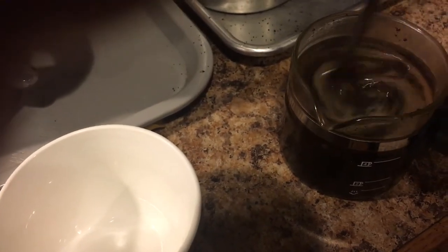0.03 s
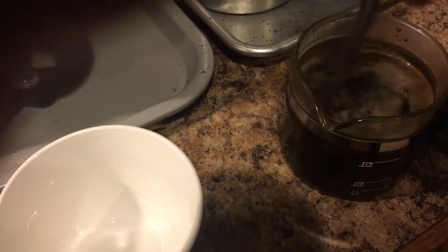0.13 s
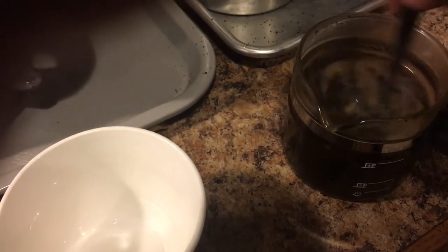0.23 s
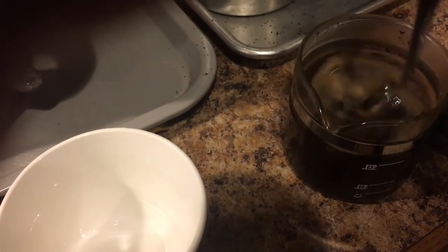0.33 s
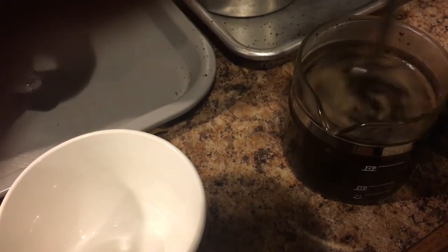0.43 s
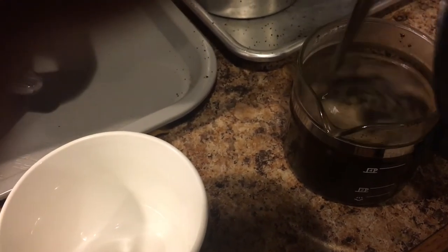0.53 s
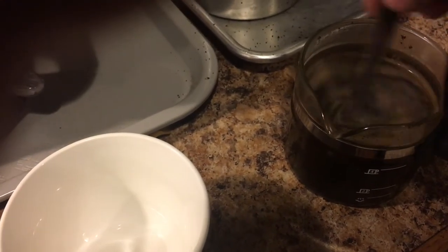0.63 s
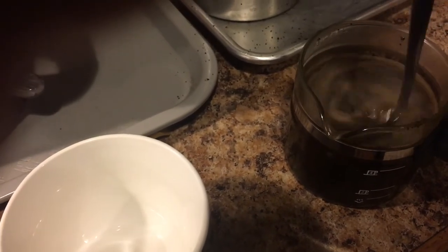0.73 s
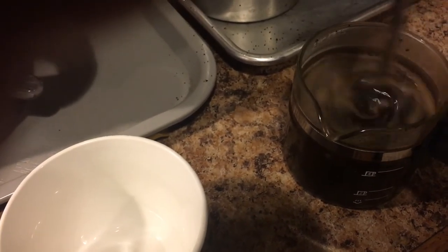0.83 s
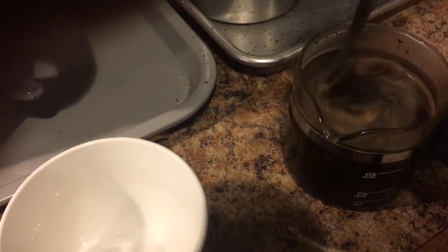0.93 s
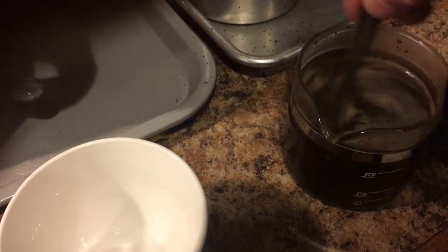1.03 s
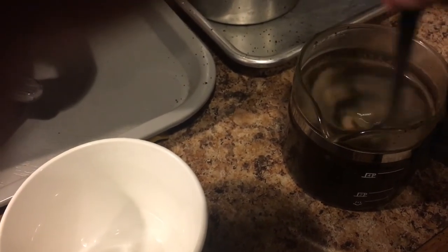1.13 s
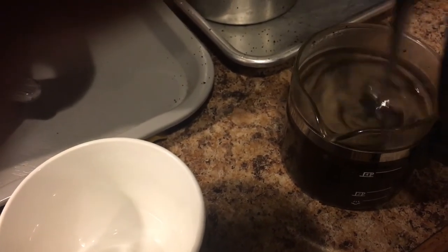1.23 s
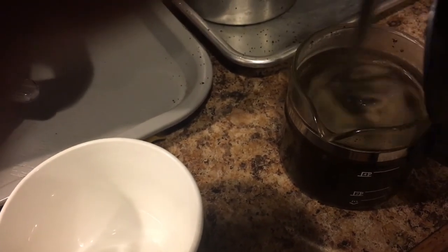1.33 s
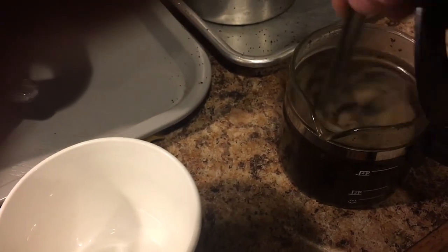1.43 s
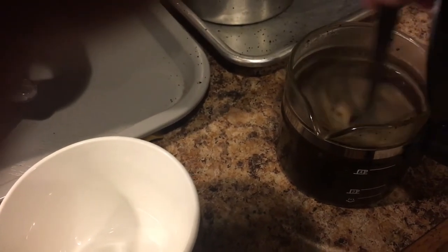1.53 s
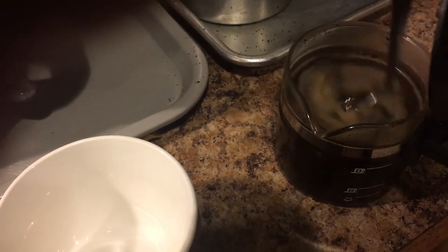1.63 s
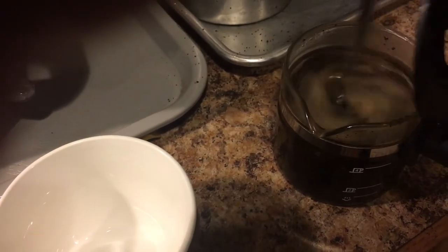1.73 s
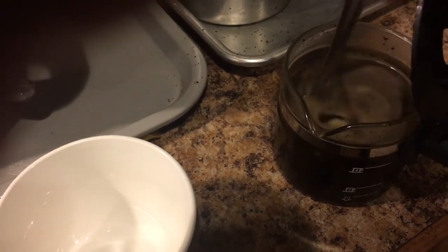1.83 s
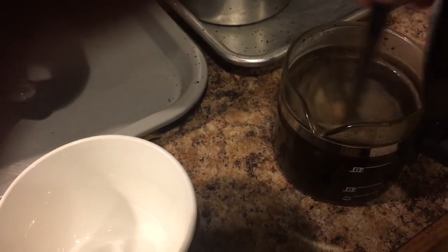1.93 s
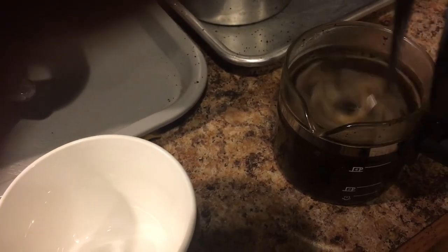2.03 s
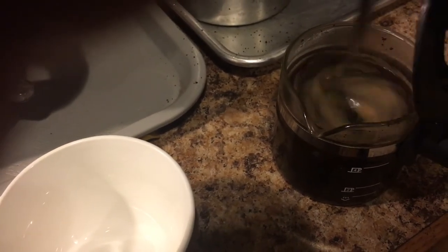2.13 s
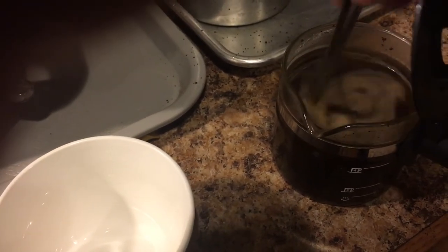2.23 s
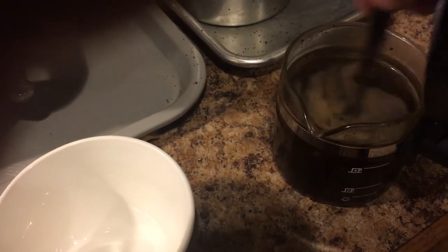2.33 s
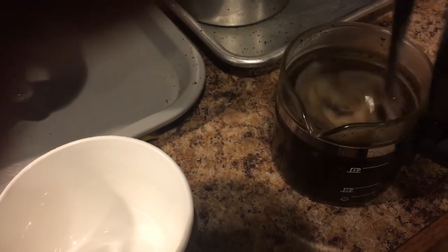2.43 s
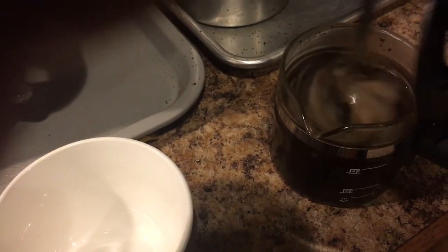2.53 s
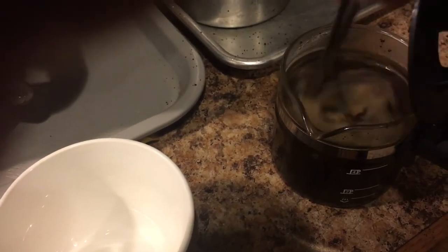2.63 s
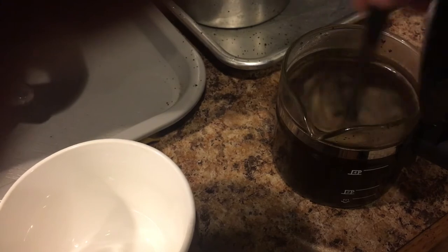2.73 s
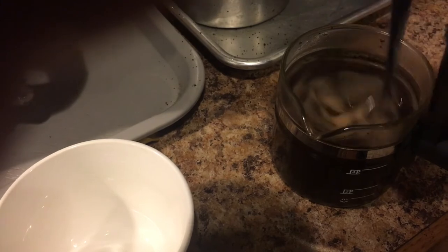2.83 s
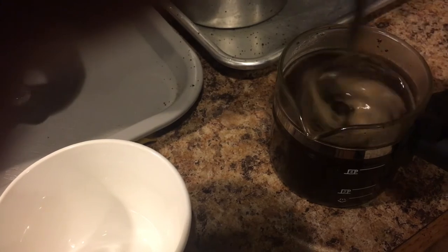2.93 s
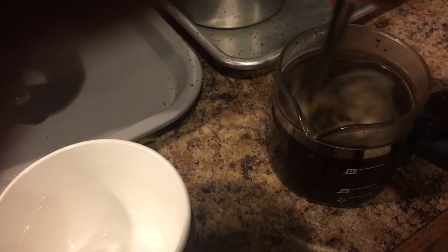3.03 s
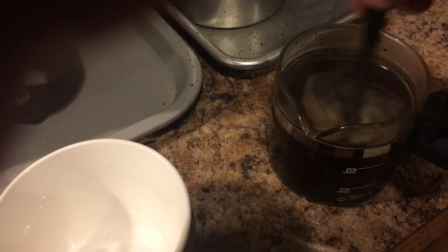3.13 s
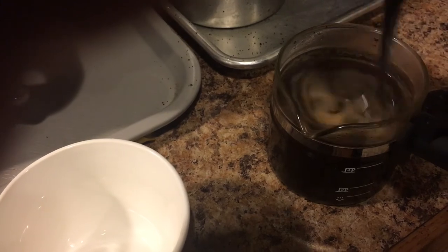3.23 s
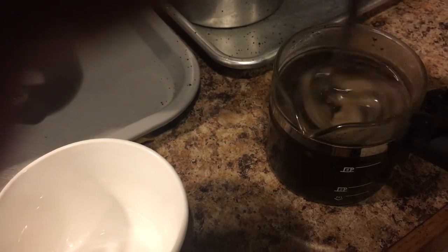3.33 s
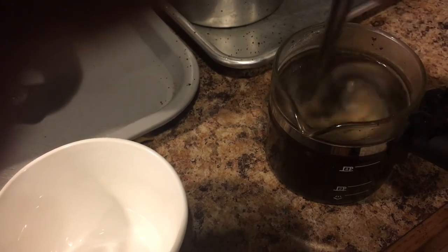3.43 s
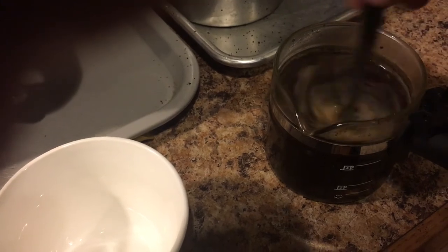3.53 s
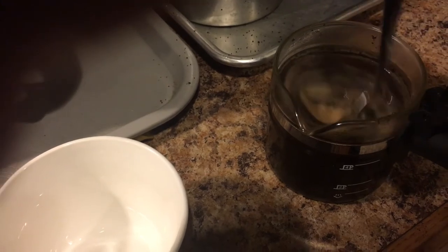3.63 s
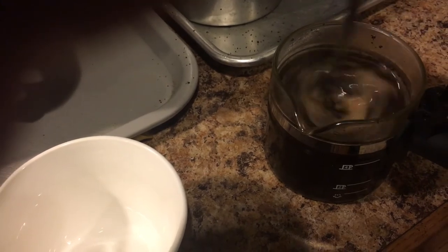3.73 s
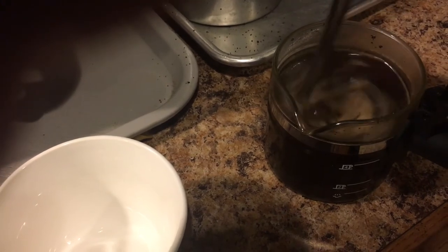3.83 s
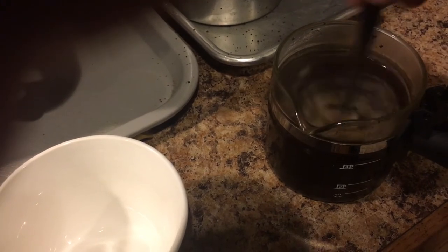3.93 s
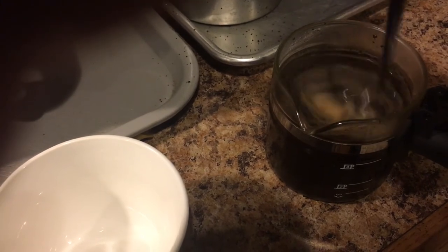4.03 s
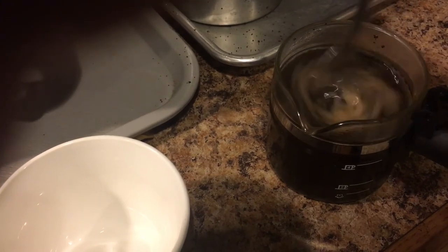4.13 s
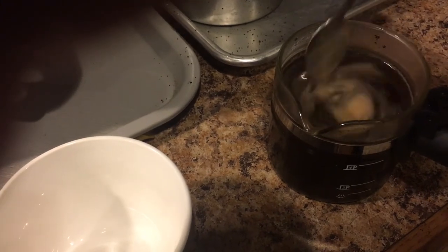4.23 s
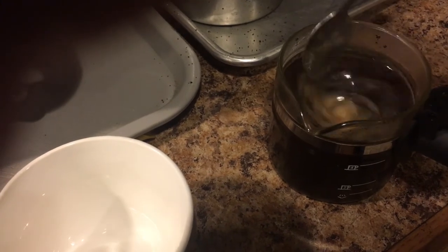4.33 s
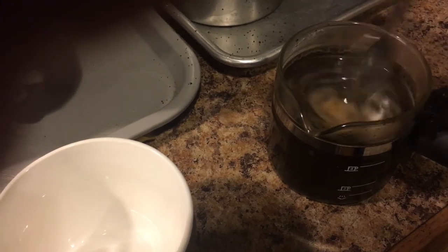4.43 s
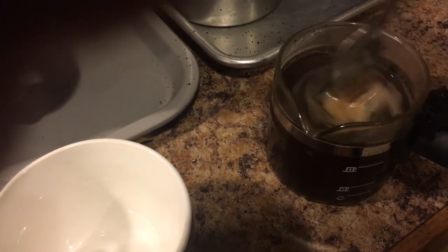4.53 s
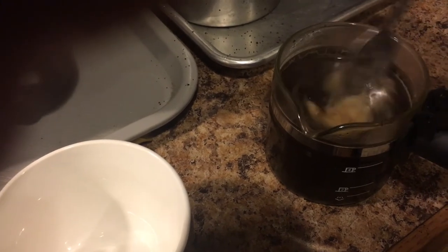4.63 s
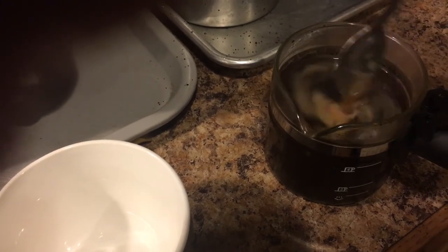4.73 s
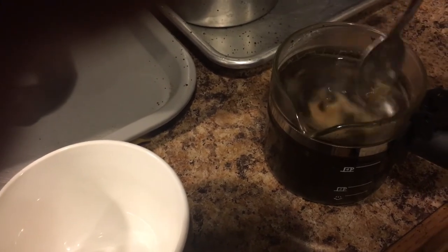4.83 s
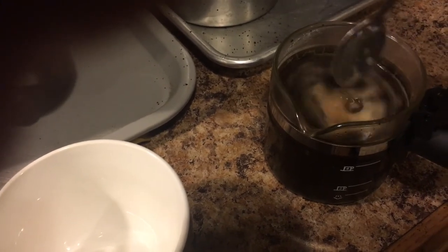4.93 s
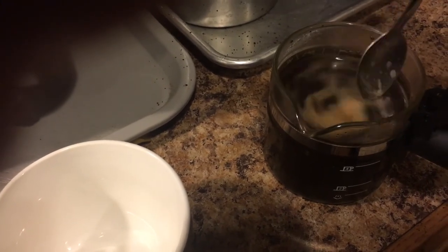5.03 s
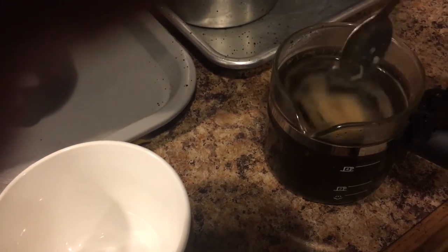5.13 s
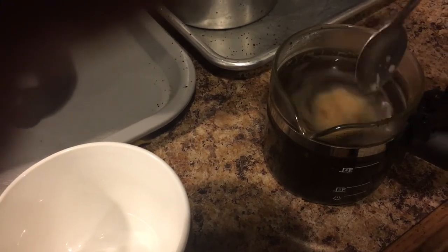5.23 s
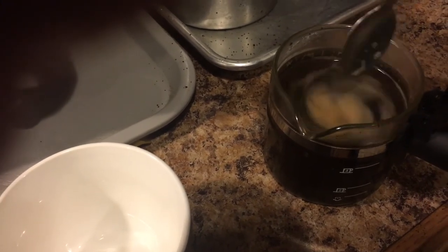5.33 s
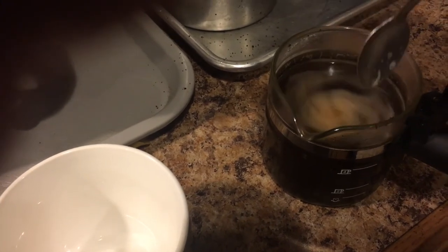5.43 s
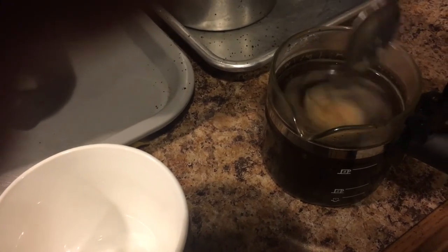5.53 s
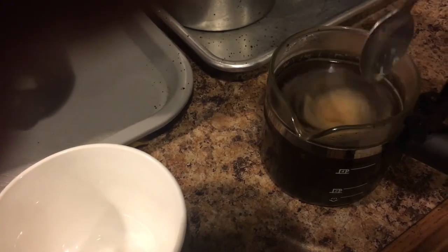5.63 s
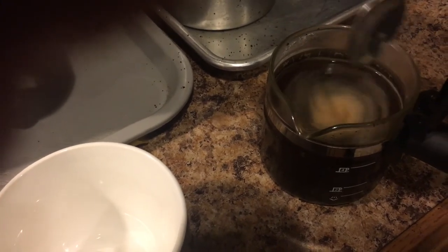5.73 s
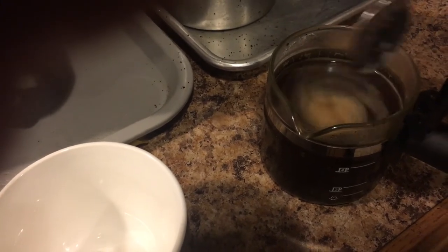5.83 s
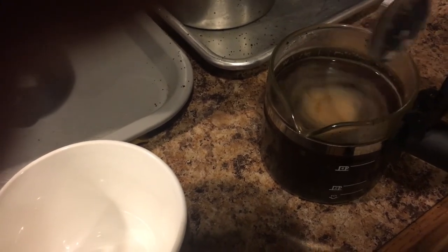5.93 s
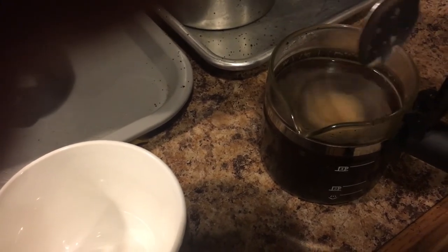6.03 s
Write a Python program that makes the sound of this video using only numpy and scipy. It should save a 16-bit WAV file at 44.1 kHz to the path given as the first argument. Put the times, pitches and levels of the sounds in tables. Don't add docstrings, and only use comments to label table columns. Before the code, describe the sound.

A steel spoon stirs a liquid-filled glass carafe, knocking near and far walls alternately with short, damped, uneven clinks, some doubled by tiny bounces. After about four and a half seconds it taps the rim seven times, steadier and more ringing. Soft rubs, low room rumble and late dull bumps sit underneath. Small kitchen, short echoes, close phone microphone.

```python
import sys
import numpy as np
from scipy import signal
from scipy.io import wavfile
from scipy.ndimage import uniform_filter1d

SR = 44100
rng = np.random.default_rng(int(sys.argv[2]) if len(sys.argv) > 2 else 0)


def store_pcm(level_fs):
    pcm = np.round(np.clip(level_fs, -1, 1) * 32767).astype(np.int16)
    wavfile.write(sys.argv[1], SR, np.atleast_2d(pcm).T)


def boost(x):
    u = np.asarray(x, float) / 20
    return 10 ** u


N = 267598

# (frequency [Hz], density [dB per Hz])
AIR_SPECTRUM = [(18, -10), (36, 11), (65, 5), (91, -10.5), (102, -3), (124, -10.5), (165, -18), (314, -13),
                (416, -16.5), (465, -26.5), (1020, -24), (2660, -40), (10500, -45.5), (15700, -46),
                (16500, -80)]
# (frequency [Hz], rms level [dB])
FRIDGE_HUM = [(59.2, -66.5), (118.4, -68.5), (264, -82.5), (378, -75), (1030, -74.5)]
# (time [s], footsteps and shuffling [dB], rustle of cloth [dB])
MOVEMENT = [(0, -3.5, 2), (.4, -2.5, 3.5), (.85, -0.5, -0.5), (1.401, 1.5, 5), (1.8, -2.5, 3.5),
            (2.251, 0.5, 2), (2.5, -3.5, 0), (3.2, 2.5, -2), (3.6, 0.5, -2), (3.76, 3.5, -0.5),
            (3.9, -1.5, -2.5), (4.301, -3.5, -2), (5.101, -3.5, 2), (5.349, 16.5, -9), (5.6, 16, -3),
            (5.8, 7.5, 4.5), (6.07, 3.5, 6)]
CALM_DB = [-65, -63.5, -58, -75.5]
STEP_SHARE = [1.2, 0.66, 0.44]
SWELL_DB = [2.2, 1.8, 1, 0.87]

# (time [s], strength [dB], sharpness [dB], favoured mode [Hz])
NEAR_BLOWS = [(0.0949, -14, 3, 3150), (0.5367, -17, 3, 2830), (0.5589, -30, -2, 2770),
              (0.5684, -32.5, -5, 1750), (0.9742, -18, -2, 1790), (0.9953, -29, -9, 1780),
              (1.006, -32.5, -7, 1790), (1.8634, -13.5, 2.5, 3780), (1.8996, -25.5, -0.5, 3820),
              (2.2477, -13.5, -0.5, 3060), (2.2779, -21, 2, 970), (2.6269, -16.5, -1.5, 3140),
              (2.6599, -25.5, -3.5, 810), (3.0222, -14, -3.5, 1950), (3.4266, -15.5, -2, 3150),
              (3.461, -22, 0, 3140), (3.4745, -28.5, -5, 3950), (3.826, -17, -1.5, 3140)]
FAR_BLOWS = [(0.2838, -10.5, 10.5, 3376), (0.7644, -16, 2.5, 1100), (1.1617, -23, -5, 2600),
             (1.1865, -36.5, -11, 1200), (1.3888, -22.5, -20.5, 2160), (1.4197, -9.5, -4.5, 3690),
             (1.4262, -28, -26, 1100), (1.4387, -17, -12, 3730), (1.447, -43, 16, 3900),
             (1.4545, -30, -11.5, 1090), (1.6083, -17.5, 3, 4620), (2.0378, -16.5, 3.5, 4340),
             (2.4079, -23.5, 2, 3900), (2.584, -45.5, -12, 2060), (3.1436, -35, -11.5, 1620),
             (3.1815, -31.5, -13.5, 1110), (3.1924, -39, -4.5, 1630), (3.2213, -28, -4.5, 3670),
             (3.5898, -31, -11, 1100), (4.0156, -20, -0.5, 3620)]
RIM_BLOWS = [(4.4707, -10, 2, 4480), (4.6615, -15.5, -2.5, 3570), (4.8284, -16.5, -1, 2013),
             (5.024, -15, 2, 2013), (5.221, -13, 2, 2013), (5.434, -10.5, 2.5, 1410),
             (5.6369, -11, 5, 1500)]
# (frequency [Hz], level [dB], t60 [s])
NEAR_MODES = [(750, -8.5, .06), (873, 2.5, 0.061), (1200, 6.5, 0.02), (1790, -17, 0.035),
              (2060, -16.5, 0.024), (2335, -14, 0.019), (2830, 0, 0.023), (3140, -0.5, 0.019),
              (3670, -10, 0.018), (3873, -8.5, 0.029), (5000, -7, .012), (5820, 9, 0.0077),
              (6600, 17, 0.0044), (8380, 6, 0.0077), (9530, -0.5, 0.011), (11980, -13, 0.0082),
              (14400, -23, .01)]
FAR_MODES = [(814, -4, 0.045), (1100, 4.5, 0.034), (1658, -0.5, 0.019), (2020, -8.5, 0.027),
             (2160, -13.5, 0.021), (2610, -9.5, 0.038), (3140, -26, 0.12), (3370, -7, 0.027),
             (3530, -6, 0.019), (3900, -3, 0.02), (4620, -7, 0.0038), (5620, -2.5, 0.014), (6824, 8, 0.01),
             (8620, 1, 0.0092), (9100, -11, .01), (11600, -9, 0.012), (13300, -43.5, .02)]
RIM_MODES = [(573, -16, 0.05), (746.8, 2, 0.095), (876, 2.5, 0.045), (1200, 2.5, 0.027), (1515, -8, 0.035),
             (2013, -5.5, 0.026), (2160, -11.5, 0.034), (2460, -3.5, 0.023), (3050, -15, 0.033),
             (3320, -12.5, 0.051), (3570, -8.5, 0.029), (4480, -12, 0.02), (5466, -6.5, 0.0089),
             (6640, 1, 0.0079), (8170, 0, 0.011), (9390, -1.5, 0.013), (11780, -1, 0.0072),
             (12220, -0.5, 0.015), (1620, -29.5, 0.19), (2330, -33, 0.28), (3390, -29, 0.16),
             (4520, -35.5, 0.13)]
BAND_EDGES_HZ = [1300, 2500, 4800]
NEAR_BALANCE_DB = [-7, -3, 1, 1]
FAR_BALANCE_DB = [-13, -6, 0, 0]
RIM_BALANCE_DB = [1.5, 3, 1, 3.5]
SHARPNESS_GAIN = [-.5, -0.38, -0.067, 0.63]
# (level over the lines [dB], t60 [s])
CRACK = [(-8.5, 0.16), (0.5, 0.074), (2.5, 0.02), (1.5, 0.0076)]
SPREAD = {"wall": (3, 0.012), "rim": (1.5, 0.003)}
# (frequency [Hz], level [dB], t60 [s])
BASE_MODES = [(308.3, 3.5, 0.06), (415.8, -2.5, 0.082), (613.3, -8, 0.1)]
ROCK_DB = {"near": -31, "far": -26.5, "rim": -17}
# (time [s], peak [dB])
SLOSHES = [(0.153, -44), (0.444, -43), (0.74, -46.5), (0.823, -49), (1.764, -45.5), (2.147, -49.5),
           (2.563, -43.5), (2.805, -46), (2.85, -45)]

# (frequency [Hz], t60 [s])
KITCHEN_T60 = [(250, 0.067), (800, 0.23), (2500, 0.38), (6000, 0.25), (14000, 0.043)]
# (frequency [Hz], level [dB])
KITCHEN_COLOUR = [(200, 6.5), (800, -2), (1300, -3), (2200, -7), (3500, -10.5), (6500, -7.5), (10000, -3),
                  (14000, -4)]

# (time [s], peak [dB], centre [Hz], t60 [s])
RUBS = [(.437, -67.5, 903, 0.066), (.738, -49, 1100, 0.032), (.818, -51, 1100, 0.065),
        (1.752, -48.5, 1100, 0.07), (2.148, -53.5, 1484, 0.095), (2.561, -59, 1200, 0.24),
        (2.755, -51, 1010, 0.069), (3.503, -45, 2150, 0.16), (3.511, -52, 2940, 0.038),
        (3.523, -61, 3850, 0.055), (3.534, -61, 3450, 0.059), (4.449, -61, 4460, 0.017)]
# (time [s], peak [dB], centre [Hz], t60 [s])
BUMPS = [(5.291, -42.5, 870, 0.31), (5.545, -46, 930, 0.34), (5.808, -49.5, 940, 0.31),
         (5.979, -52, 900, 0.22)]

TICK_DB, TICK_T60_S = 10, 0.0054
FAVOUR_DB, FAVOURED_BAND_DB = 11.5, 4
CRACK_DB_PER_SHARP_DB = 0.31
KITCHEN_DB, LINES_TO_ROOM_DB = -11, -6.5
EARLY_DB, EARLY_T60_S = 12.5, 0.036
LIMIT = 0.95
EDGE_HZ = 15900


def evened(x):
    return x / np.sqrt(np.mean(x ** 2) + 1e-20)


def read(points, hz):
    f, value = np.transpose(points)
    return np.interp(np.log(hz + 1), np.log(f + 1), value)


def add(mix, time_s, sound):
    part = mix[round(time_s * SR):][:len(sound)]
    part += sound[:len(part)]


def band(x, lo_hz, hi_hz):
    return signal.sosfilt(signal.butter(2, [lo_hz, hi_hz], "bandpass", fs=SR, output="sos"), x)


def fridge_hum():
    out, t = np.zeros(N), np.arange(N) / SR
    for hz, db in FRIDGE_HUM:
        drift = np.cumsum(evened(uniform_filter1d(rng.standard_normal(N), 3000))) / SR
        out += boost(db + 5.5) * np.sin(2 * np.pi * (hz * t + 0.02 * hz * drift))
    return out


def room_air():
    frames, hz = N // 256 + 5, np.fft.rfftfreq(1024, 1 / SR)
    real, imag, patches = rng.standard_normal((frames, 513, 3)).T
    patches = evened(uniform_filter1d(uniform_filter1d(patches, 10, 0), 10, 1))
    z = (real + 1j * imag) * boost(read(AIR_SPECTRUM, hz)[:, None] + 1.2 * patches)

    deep = 1 / (1 + (hz / 78) ** 8)
    low = 1 / (1 + (hz / 150) ** 6)
    high = 1 / (1 + (3000 / (hz + 1)) ** 4)
    ranges = [deep, low * (1 - deep), (1 - low) * (1 - high), high]
    time_s, steps_db, rustle_db = np.transpose(MOVEMENT)
    lifts = [share * steps_db for share in STEP_SHARE] + [rustle_db]

    out, t = np.zeros(N), np.arange(N) / SR
    for power, calm_db, lift_db, swell_db in zip(ranges, CALM_DB, lifts, SWELL_DB):
        noise = signal.istft(z * np.sqrt(power)[:, None], nperseg=1024, noverlap=768)[1][:N]
        swell = uniform_filter1d(uniform_filter1d(rng.standard_normal(N), 4000), 4000)
        level_db = calm_db + np.interp(t, time_s, lift_db) + swell_db * evened(swell)
        out += evened(noise) * boost(level_db)
    return out


def ring(modes, size=6000):
    hz, db, t60 = np.transpose(modes)[:, :, None]
    t = np.arange(size) / SR
    phase = rng.random(hz.shape)
    swell = 1 - np.exp(-t * hz * 1.95)
    return boost(db - 60 * t / t60) * np.sin(2 * np.pi * (hz * t + phase)) * swell


def clink(modes, spread, balance_db, strength_db, sharp_db, favoured_hz):
    hz, db, t60 = np.transpose(modes)
    spread_db, spread_pitch = spread
    chance = rng.standard_normal((2, len(hz)))
    favour = np.exp(-(np.log(hz / favoured_hz) / 0.09) ** 2)
    db = db + spread_db * chance[0] + FAVOUR_DB * favour
    rings = ring(np.transpose([hz * (1 + spread_pitch * chance[1]), db, t60]))

    t = np.arange(rings.shape[1]) / SR
    noise = rng.standard_normal(len(t))
    tick = boost(TICK_DB - 60 * t / TICK_T60_S)
    edges_hz = [400, *BAND_EDGES_HZ, 13000]
    group = np.digitize(hz, BAND_EDGES_HZ)
    favoured = np.arange(len(balance_db)) == np.digitize(favoured_hz, BAND_EDGES_HZ)
    peaks_db = strength_db + np.add(balance_db, np.multiply(SHARPNESS_GAIN, sharp_db))
    peaks_db = peaks_db + FAVOURED_BAND_DB * favoured

    out = np.zeros((2, len(t)))
    for k, peak_db in enumerate(peaks_db):
        crack_db, crack_t60 = CRACK[k]
        tones = rings[group == k].sum(0)
        burst = band(noise * (boost(-60 * t / crack_t60) + tick), edges_hz[k], edges_hz[k + 1])
        burst_gain = boost(crack_db + CRACK_DB_PER_SHARP_DB * sharp_db)
        part = np.array([tones / abs(tones).max(), burst_gain * burst / abs(burst).max()])
        out += boost(peak_db) * part / abs(part.sum(0)).max()
    return out


def spoon_on_carafe():
    places = [("near", NEAR_BLOWS, NEAR_MODES, NEAR_BALANCE_DB, SPREAD["wall"]),
              ("far", FAR_BLOWS, FAR_MODES, FAR_BALANCE_DB, SPREAD["wall"]),
              ("rim", RIM_BLOWS, RIM_MODES, RIM_BALANCE_DB, SPREAD["rim"])]
    out, thuds = np.zeros((2, N)), list(SLOSHES)
    for place, blows, modes, balance_db, spread in places:
        for time_s, strength_db, sharp_db, favoured_hz in blows:
            thuds.append((time_s, strength_db + ROCK_DB[place]))
            sounds = clink(modes, spread, balance_db, strength_db, sharp_db, favoured_hz)
            for row, sound in zip(out, sounds):
                add(row, time_s, sound)
    for time_s, db in thuds:
        add(out[1], time_s, boost(db) * ring(BASE_MODES).sum(0))
    return out


def kitchen_echoes(x):
    taps = np.zeros(SR // 2)
    at = np.arange(120, len(taps) - 10, 10)
    taps[at + rng.integers(0, 10, len(at))] = rng.choice([-1., 1.], len(at))
    hz, t, z = signal.stft(taps, SR, nperseg=128)
    late = boost(-60 * t / read(KITCHEN_T60, hz)[:, None])
    early = boost(EARLY_DB - 60 * t / EARLY_T60_S)
    z = z * boost(read(KITCHEN_COLOUR, hz)[:, None]) * (late + early)
    tail = signal.istft(z, SR, nperseg=128)[1]
    return signal.fftconvolve(x, tail / np.linalg.norm(tail))[:N]


def scuffs(events, width, rough_db):
    out, t = np.zeros(N), np.arange(14000) / SR
    for time_s, db, hz, t60 in events:
        noise = rng.standard_normal(len(t))
        grain = evened(uniform_filter1d(rng.standard_normal(len(t)), 150))
        rough = band(noise * boost(rough_db * grain), hz / width, hz * width)
        shape = boost(-60 * t / max(t60, 0.02)) * (1 - np.exp(-t / 0.00069))
        add(out, time_s, boost(db) * evened(rough) * shape)
    return out


def scene():
    lines, crack = spoon_on_carafe()
    crack = crack + scuffs(RUBS, 1.8, 1.8) + scuffs(BUMPS, 1.83, 1.4)
    echoes = kitchen_echoes(boost(LINES_TO_ROOM_DB) * lines + crack)
    background = room_air() + fridge_hum()
    return (lines + crack + boost(KITCHEN_DB) * echoes + background)[None]


def band_limit(x):
    return signal.sosfilt(signal.butter(12, 17090, fs=SR, output="sos"), x)


def record(dry):
    rounded = dry / (1 + (dry / LIMIT) ** 4) ** (1 / 4)
    edge = signal.cheby1(8, 0.5, EDGE_HZ, fs=SR, output="sos")
    mix = signal.sosfilt(edge, rounded)
    return band_limit(mix)


dry = scene()
out = record(dry)
store_pcm(out)
```